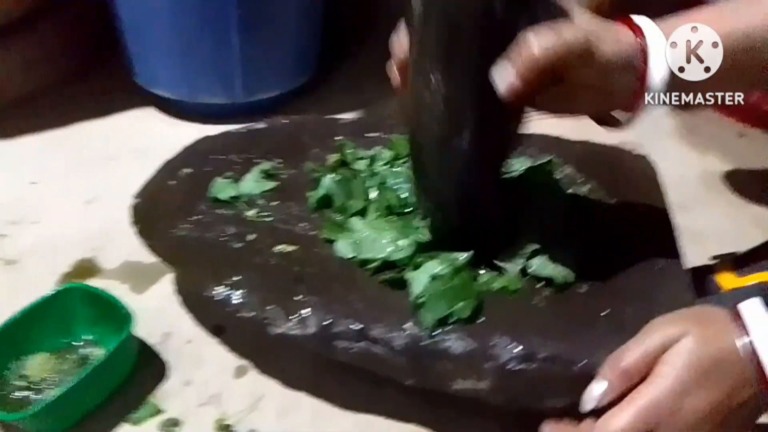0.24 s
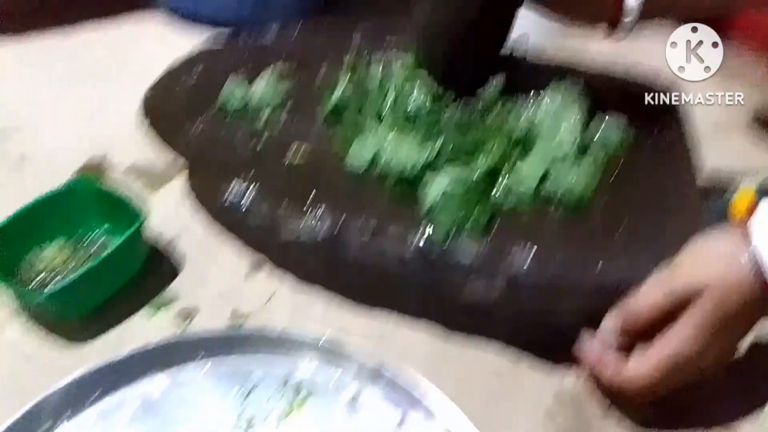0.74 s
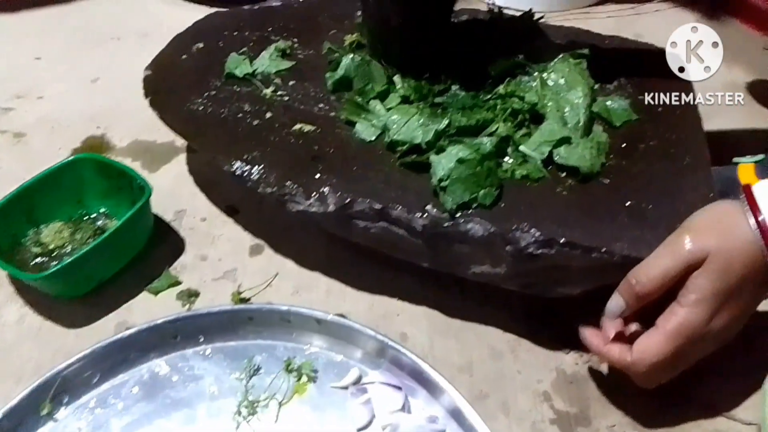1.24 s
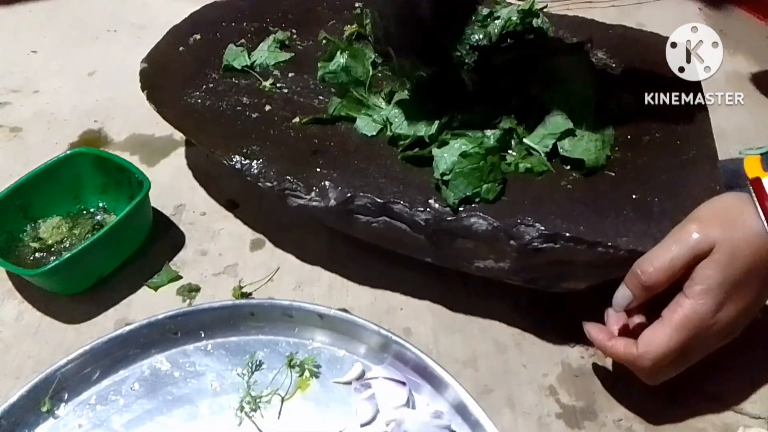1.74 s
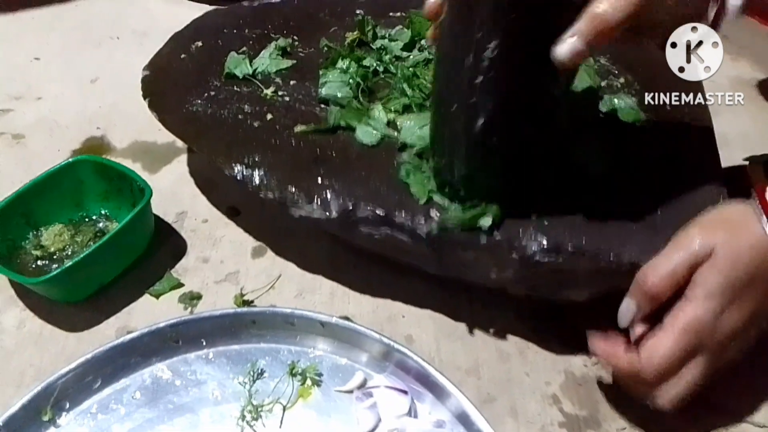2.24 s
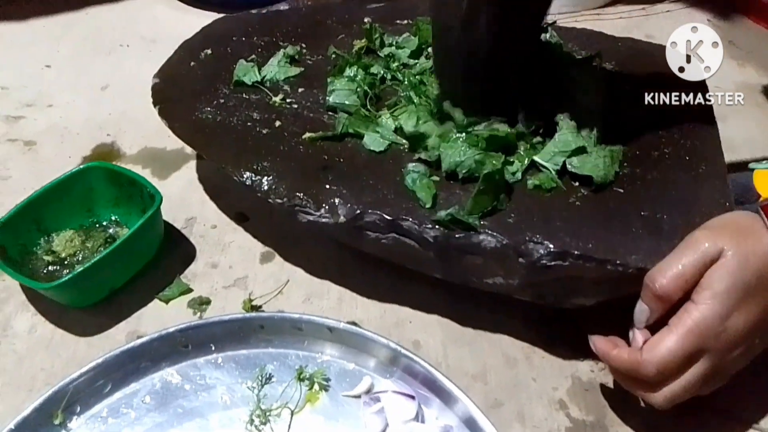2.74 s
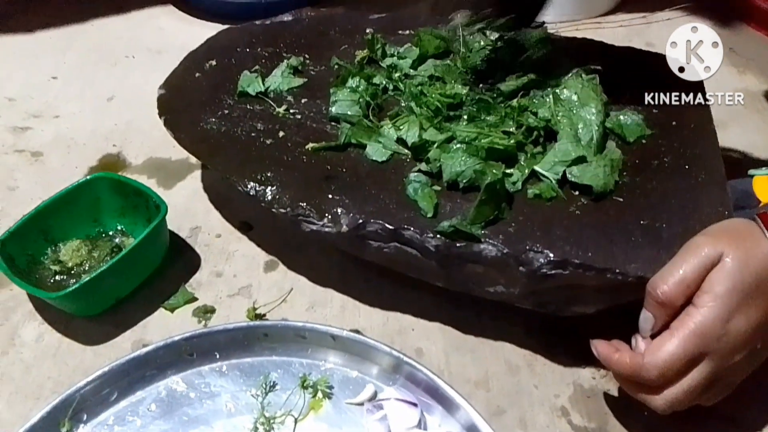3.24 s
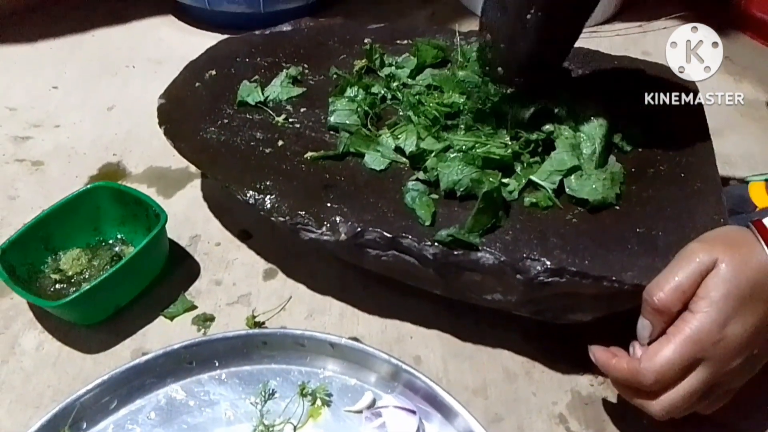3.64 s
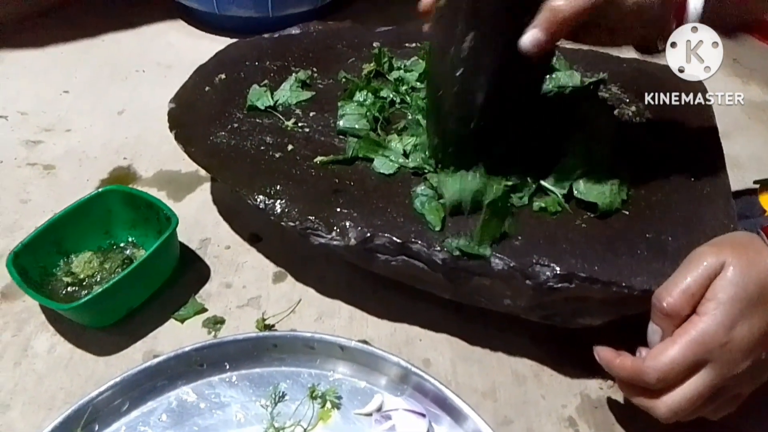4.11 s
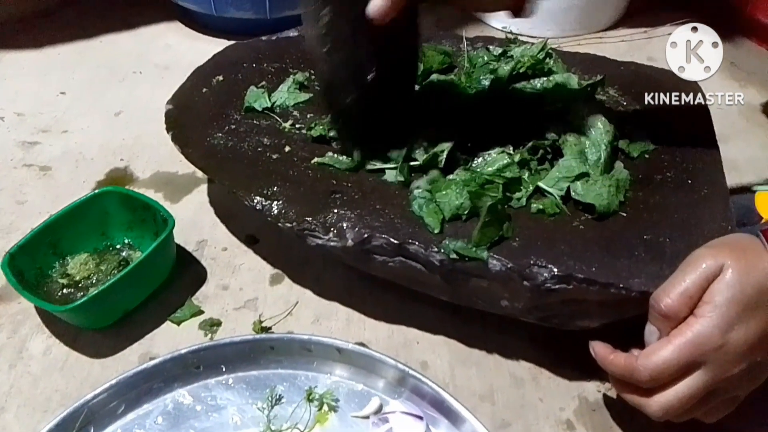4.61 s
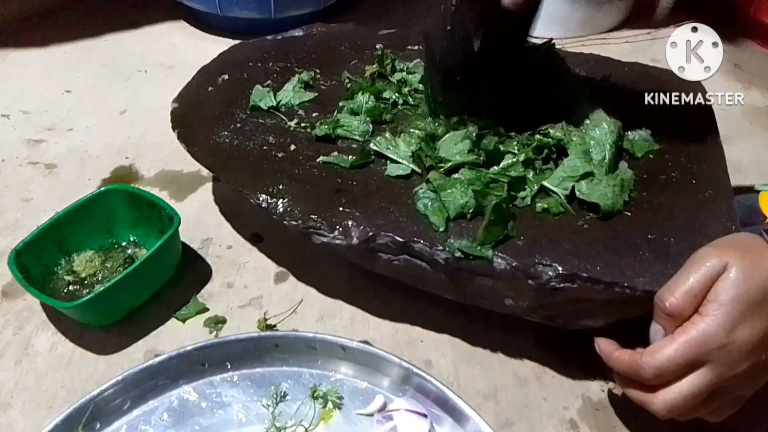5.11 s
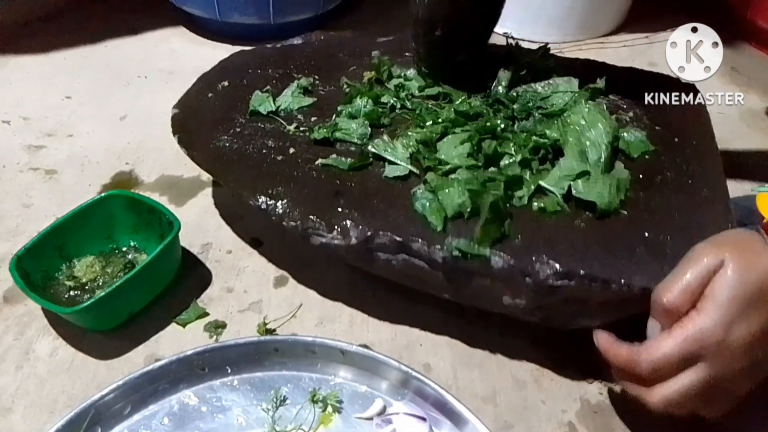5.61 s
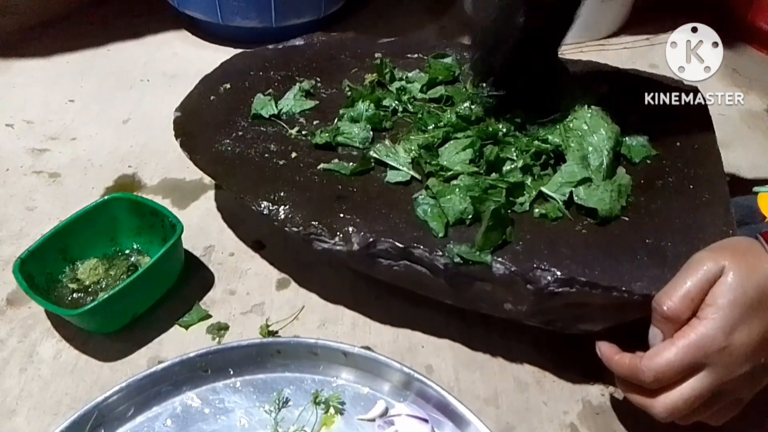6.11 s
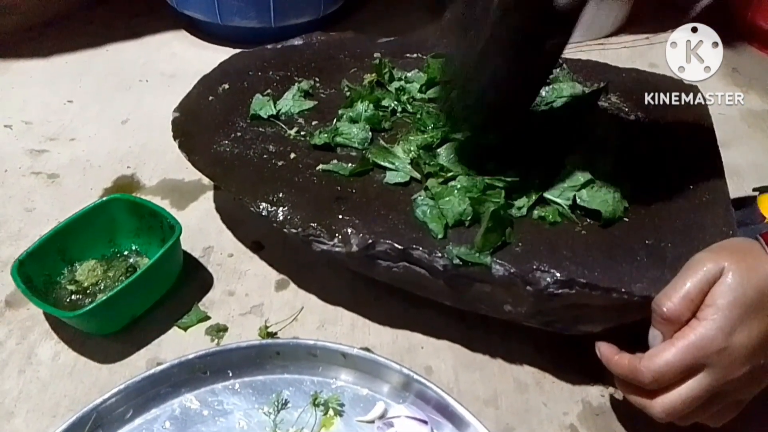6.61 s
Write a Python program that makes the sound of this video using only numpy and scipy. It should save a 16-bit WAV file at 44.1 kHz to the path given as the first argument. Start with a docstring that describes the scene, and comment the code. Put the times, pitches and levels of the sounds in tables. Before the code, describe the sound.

Steady stone pounding of leaves, under three blows a second, mostly soft and leafy, with a few loud stone-on-stone knocks and short room echo.

```python
"""A hand-held stone pounds fresh leaves on a flat slab on a kitchen floor, under three blows a second.
Each blow layers leaf crackle, a clack of stone modes and grit noise, a low thud of floor modes and a wet squelch.
Between blows come gritty ticks, scrapes and rustles of crackling noise; a steel tray rings as fluttering modes.
Standing waves and shifting noise echoes make the small hard room, over a faint bed of coloured noise."""
import sys
import numpy as np
from scipy import signal
from scipy.fft import rfft, irfft
from scipy.io import wavfile

SR = 44100
rng = np.random.default_rng(int(sys.argv[2]) if len(sys.argv) > 2 else 0)


def digitize_waveform(pressure):
    """Quantize a signal to 16-bit integers and store it at the path in sys.argv[1].

    Rows of a 2-D input are taken as channels; values are limited to [-1, 1].
    """
    field = np.atleast_2d(pressure).T
    bounded = np.clip(field, -1, 1)
    quanta = np.round(bounded * 32767).astype(np.int16)
    wavfile.write(sys.argv[1], SR, quanta)


N = 302526
T = np.arange(int(1.5 * SR)) / SR  # time axis for single sounds, s

# Levels in the tables are relative: each layer adds its own mix gain.
# blows of the stone: landing_s, clack_db, contact_hardness_hz, grit_in_clack_db,
# leaf_crunch_db, wet_squelch_db, floor_thud_db
STONE_BLOWS = [ (0.194, -43.5, 840, -2, -42.5, -60, -43), (0.568, -39.5, 860, 0, -37.5, -51, -39.5),
               (0.94, -31.5, 924, -5.5, -36, -49.5, -39), (1.2887, -7, 1026, -10, -29, -51.5, -33.5),
               (1.649, -30, 657, 0, -41, -68, -36.5), (2.037, -29.5, 894, 1.5, -37.5, -56, -37.5),
               (2.408, -32, 950, -1.5, -35, -50, -40), (2.803, -7.5, 1850, -4, -28.5, -46.5, -31.5),
               (3.196, -42.5, 847, 0.5, -38, -44, -38.5), (3.551, -49, 840, -3, -39.5, -56.5, -41),
               (3.911, -14.5, 1510, -4.5, -33, -44, -33.5), (4.284, -5, 1715, -6, -33, -65.5, -31),
               (4.607, -45, 890, 11, -47.5, -67, -44.5), (4.949, -36.5, 806, -0.5, -37.5, -49, -40.5),
               (5.371, -7.5, 1660, -3, -33.5, -45, -34), (5.748, -31, 680, 0, -35.5, -65, -40.5),
               (6.113, -34, 747, -2, -37.5, -52, -40.5), (6.479, -11, 1286, -4.5, -35, -53, -32.5)]
# small taps, scrapes and leaf rustles between blows: start_s, decay_s, grit_level_db
TAPS_AND_SCRAPES = [(0.0, 0.095, -69.5), (0.473, 0.0051, -50.5), (0.797, 0.0093, -49.5),
                    (0.86, 0.035, -73.5), (2.974, 0.0055, -29), (3.325, .054, -67.5), (3.708, 0.023, -65.5),
                    (5.535, 0.035, -40.5), (5.963, 0.018, -53.5), (6.629, 0.0033, -48)]
# nudges of the tray: start_s, level_db
TRAY_NUDGES = [(0.797, -64.5), (0.947, -62.5), (3.108, -68)]
# modes of the slab, before the leaf pad lowers and damps them: pitch_hz, level_db, free_t60_s
SLAB_MODES = [(537, -16.5, 0.0085), (648, -7.5, 0.036), (720, -12.5, 0.023), (862.3, -1, .03),
              (846, 3, 0.035), (972.8, -9, 0.067), (1118.3, -10.5, 0.03), (1228, -9.5, 0.025),
              (1294, -6, 0.038), (1344.4, -8, 0.046), (1428.5, -15.5, 0.025), (1572, -14, .03),
              (1726, -10.5, 0.025), (1942, -14, 0.037)]
# modes of the hand stone: pitch_hz, level_db, t60_s
PESTLE_MODES = [(2281, -9.5, 0.01), (2309, -9.5, 0.033), (2290, -13.5, 0.0061), (2720, -18, 0.035),
                (2807, -25.5, 0.021), (3000, -33, 0.037), (5350, -21.5, 0.043)]
# modes of the slab on the floor: pitch_hz, level_db, t60_s
FLOOR_MODES = [(56, -14, 0.26), (84, -1, 0.072), (115.3, -2, 0.022), (145, -8, 0.039), (196, -12, 0.15)]
# modes of the steel tray: pitch_hz, level_db, t60_s
TRAY_MODES = [(860, -2.5, .8), (930, -8.5, .8), (972, -10.5, .7), (1260, -1, 0.4), (1360, 5, 1.2),
              (1380, 1, 2.5), (1290, -4.5, 1), (1420, -6, 1), (1310, -9.5, 0.41), (1637, -12.5, .9),
              (1642, -6, 1.1), (3960, -10.5, 2.2), (4140, -15.5, 2.5), (5770, -14, 1.4)]
# noise colour of bursting leaves: frequency_hz, density_db (per Hz)
CRUNCH_COLOUR = [(300, -29), (1500, -18), (2300, 2), (3200, 9), (5000, 3.5), (7800, 0.5), (10000, -15),
                 (13500, -2), (16000, -11.5)]
# noise colour of grit between stones: frequency_hz, density_db (per Hz)
GRIT_COLOUR = [(150, -2), (330, -6), (800, -4.5), (1350, -6), (1900, -13), (2800, -4), (4000, -15),
               (8000, -34.5), (16000, -38.5)]
# noise colour of the household air: frequency_hz, density_db (per Hz)
AIR_COLOUR = [(25, -15), (50, -10.5), (90, 1), (170, -8.5), (300, -15.5), (420, -10), (800, -7.5),
              (1300, -5), (2000, -12.5), (3200, -15.5), (5000, -25), (10000, -37.5), (14000, -31),
              (16000, -38.5)]
# kitchen echo bands, two layers that start together: centre_hz, near_level_db, near_t60_s, house_level_db,
# house_t60_s
ECHO_BANDS = [(60.3, -4.5, 0.57, -2.5, 1.2), (175, 3.5, 0.53, -0.5, 0.13), (344, -3, 0.55, -12, 0.96),
              (740.7, -4.5, 0.25, -33.5, 2.2), (1300, 1.5, 0.38, -13, 0.82), (2376, 1, 0.39, -15.5, 0.43),
              (4240, -9.5, 0.36, -2, 0.67), (8330, -1.5, 0.38, -11, 0.78), (15100, -11.5, 0.6, -10, .45)]
# standing waves of the kitchen: pitch_hz, level_db
STANDING_WAVES = [(91, -56), (174, -54.5), (193, -50.5), (670, -56), (718, -77), (737, -55), (912, -45.5),
                  (987, -43), (1125, -53.5), (1224, -63), (1313, -69.5), (1345, -56.5), (2024, -51),
                  (2282, -59), (2328, -56.5), (2360, -58.5)]

# The clack level tells how much of the leaf pad a blow gets through; the pairs below follow from it.
PADDED_DB, BARE_DB = -36.5, -11  # clack on a thick pad, and on bare stone
# each pair: (on a thick pad, on bare stone)
FREE_RING = (0.6, 0.69)  # share of the slab's free ringing time
SLAB_PITCH = (0.93, 0.96)  # wet pulp loads the slab and lowers its modes
UPPER_SLAB_DB = (-3, 6)
PESTLE_RING_DB = (-6, 7)
CRUSH_S = (0.0052, 0.0014)
PULP_S = 0.004  # the stone already presses on the slab this long before it lands


def pounding(clack_mix_db=-6, crunch_mix_db=-5, squelch_mix_db=-3, thud_mix_db=-3, thud_lag_s=0.005):
    """Each blow crunches, clacks, thuds and squelches; a thinner pad gives way sooner and damps less."""
    out = np.zeros(N)
    for land_s, clack_db, hard_hz, grit_db, leaf_db, wet_db, floor_db in STONE_BLOWS:
        def by_pad(pair):
            return np.interp(clack_db, [PADDED_DB, BARE_DB], pair)

        crush_s = by_pad(CRUSH_S)
        leaves = crunch(crush_s) * undb(leaf_db + crunch_mix_db)
        add(out, land_s - 2 * crush_s, leaves)

        stones = clack(hard_hz, by_pad(FREE_RING), by_pad(SLAB_PITCH), by_pad(UPPER_SLAB_DB),
                       by_pad(PESTLE_RING_DB), grit_db)
        add(out, land_s - PULP_S, strength(stones, clack_db + clack_mix_db))

        # the heavy slab answers late
        add(out, land_s + thud_lag_s, strength(thud(), floor_db + thud_mix_db))
        add(out, land_s, squelch() * undb(wet_db + squelch_mix_db))
    return out


def clack(hard_hz, free, pitch, upper_db, pestle_db, grit_db, grit_t60=0.021, bite_s=0.0011, size=8192):
    """Stone meets stone: both ring briefly, upper slab modes more on bare stone, and grit cracks between."""
    upper_from_hz = 1050
    slab_modes = [(hz, db + upper_db * (hz > upper_from_hz), t60) for hz, db, t60 in SLAB_MODES]
    slab = ring(slab_modes, size, free, pitch, scatter_db=1.0)
    pestle = undb(pestle_db) * ring(PESTLE_MODES, size)
    grit = noise(GRIT_COLOUR, size) * fade(grit_t60, size)
    bite = (1 + np.tanh((T[:size] - PULP_S) / bite_s)) / 2  # the last film of pulp gives way
    contact = bite * (strength(slab + pestle, 0) + strength(grit, grit_db))
    return radiate(soften(contact, hard_hz), low_hz=526.3, high_hz=3040)


def soften(x, hz):
    """A soft contact pushes for longer and leaves the high modes quiet: a low-pass."""
    return signal.sosfilt(signal.butter(2, min(hz, SR / 3), fs=SR, output="sos"), x)


def radiate(x, low_hz, high_hz):
    """A small stone moves little air in the bass, and its blunt face gives little treble."""
    return signal.sosfilt(signal.butter(3, [low_hz, high_hz], "band", fs=SR, output="sos"), x)


def thud(pad_hz=210, rumble_hz=45):
    """The padded weight of the blow shakes the slab on the floor, ringing its low modes."""
    x = soften(ring(FLOOR_MODES, size=16384, scatter_db=4.5), pad_hz)
    return signal.sosfilt(signal.butter(2, rumble_hz, "high", fs=SR, output="sos"), x)


def crunch(crush_s, spread_db=3, release_s=0.0043):
    """Bursting leaf cells swell to a plateau before the landing, then die away after it."""
    x = crackle(CRUNCH_COLOUR, spread_db)
    t = T[:len(x)] - 2 * crush_s  # zero at the landing
    press = np.exp(-(np.minimum(t + crush_s / 2, 0) / (0.54 * crush_s)) ** 2)
    release = np.exp(-np.maximum(t, 0) / release_s)
    return x * press * release


def squelch(spread_db=5, decay_s=0.012):
    """Juice spits out from under the resting stone as a decaying crackle."""
    x = crackle(CRUNCH_COLOUR, spread_db, size=16384)
    return x * np.exp(-T[:len(x)] / decay_s)


def taps_and_scrapes(spread_db=3, attack_s=0.002, rustle_db=-32, rustle_follow=0.65):
    """Gritty ticks and scrapes: decaying crackle, with a leaf rustle that grows with the grit."""
    out = np.zeros(N)
    for start_s, decay_s, grit_db in TAPS_AND_SCRAPES:
        leaf_db = rustle_db + rustle_follow * grit_db  # follow: dB of rustle per dB of grit
        grit = undb(grit_db) * crackle(GRIT_COLOUR, spread_db, size=16384)
        leaves = undb(leaf_db) * crackle(CRUNCH_COLOUR, spread_db, size=16384)
        t = T[:len(grit)]
        envelope = (1 - np.exp(-t / attack_s)) * np.exp(-t / decay_s)
        add(out, start_s, (grit + leaves) * envelope)
    return out


def tray(shaken_db=-69, follow=0.25, rock_s=0.02):
    """Nudges and blows set the tray's modes ringing, hard blows more; it rocks, so the ring flutters."""
    pushes = np.zeros(N)
    for start_s, db in TRAY_NUDGES:
        add(pushes, start_s, undb([db]))
    for land_s, clack_db, *_ in STONE_BLOWS:
        add(pushes, land_s, undb([shaken_db + follow * clack_db]))
    flutter = wander(rock_s)
    ringing = signal.fftconvolve(pushes, ring(TRAY_MODES, len(T)))[:N]
    return ringing * flutter / flutter.std()


def shifting_room(x, shift_s=1.4, standing_mix_db=-3.5, standing_t60=0.3):
    """Standing waves ring along; echo patterns cross-fade as the cook and the phone move."""
    place = np.arange(N) / SR / shift_s  # a new pattern takes over every shift_s
    modes = [(hz, db, standing_t60) for hz, db in STANDING_WAVES]
    standing = undb(standing_mix_db) * ring(modes, len(T))
    out = x + signal.fftconvolve(x, standing)[:N]
    for k in range(int(place[-1]) + 2):
        share = np.maximum(1 - np.abs(place - k), 0)
        out += signal.fftconvolve(x * np.sqrt(share), kitchen())[:N]
    return out


def kitchen(first_wall_s=0.0013, build_s=0.0022, build_cycles=2.9, size=49152):
    """One echo pattern: banded noise in two decaying layers, the near walls and the rest of the house."""
    log_f = np.log(np.maximum(np.fft.rfftfreq(size, 1 / SR), 1))
    log_hz = np.log([row[0] for row in ECHO_BANDS])
    spectra = rfft(rng.standard_normal((2, size)))
    response = np.zeros(size)
    for share, (hz, near_db, near_t60, house_db, house_t60) in zip(np.eye(len(ECHO_BANDS)), ECHO_BANDS):
        bands = irfft(spectra * np.interp(log_f, log_hz, share), size)
        # long waves take longer to fill the room
        onset = 1 - np.exp(-np.maximum(T[:size] - first_wall_s, 0) / (build_s + build_cycles / hz))
        for band, db, t60 in zip(bands, (near_db, house_db), (near_t60, house_t60)):
            shape = onset * fade(t60, size)
            response += undb(db) * band * shape / np.sqrt(np.sum(shape ** 2))
    return response


def background(level_db=-66.5, sway_db=1, sway_s=0.27):
    """Faint household air: coloured noise that swells and sinks a little."""
    return noise(AIR_COLOUR, N) * undb(level_db + sway_db * wander(sway_s))


def undb(db):
    """Decibels to gain."""
    return 10 ** (np.asarray(db) / 20)


def fade(t60, size):
    """An exponential decay that loses 60 dB in t60 seconds."""
    return np.exp(-np.log(1000) * T[:size] / t60)


def add(out, start_s, x):
    """Mix x into out from start_s, trimming whatever falls outside."""
    i = int(round(start_s * SR))
    x, i = x[max(-i, 0):], max(i, 0)
    out[i:i + len(x)] += x[:len(out) - i]


def wander(step_s):
    """A random curve over the whole scene, with a new target every step_s seconds."""
    knots = np.arange(0, N / SR + 1, step_s)
    return np.interp(np.arange(N) / SR, knots, rng.standard_normal(len(knots)))


def noise(colour, size):
    """Noise of rms 1, its spectrum drawn through the points of a colour table."""
    hz, db = np.transpose(colour)
    f = np.maximum(np.fft.rfftfreq(size, 1 / SR), 1)
    gain = undb(np.interp(np.log(f), np.log(hz), db))
    x = irfft(rfft(rng.standard_normal(size)) * gain, size)
    return x / x.std()


def crackle(colour, spread_db, size=8192):
    """Dense tiny bursts of very unequal strength, at rms 1."""
    grain = 16  # samples
    strengths = undb(spread_db * np.minimum(rng.exponential(size=size // grain), 4))
    x = noise(colour, size) * np.repeat(strengths, grain)
    return x / x.std()


def ring(modes, size, free=1, pitch=1, scatter_db=0):
    """Sum of decaying modes; free scales the ring times, and scatter weights the modes anew."""
    gains = undb(scatter_db * rng.standard_normal(len(modes)))
    out = np.zeros(size)
    for gain, (hz, db, t60) in zip(gains, modes):
        wave = np.cos(2 * np.pi * hz * pitch * T[:size])
        out += gain * undb(db) * fade(t60 * free, size) * wave
    return out


def strength(x, db):
    """Set the rms of the first 10 ms."""
    return x * undb(db) / np.sqrt(np.mean(x[:SR // 100] ** 2))


def gain_control(x, threshold_db=-32, slope=0.25, sense_s=0.096, settle_s=0.42):
    """A sluggish automatic gain: a hard clack gets through, its echo is turned down."""
    def lag(v, s):
        pole = np.exp(-1 / (s * SR))
        return signal.lfilter([1 - pole], [1, -pole], v)

    level_db = 10 * np.log10(lag(x ** 2, sense_s) + 1e-18)
    over_db = np.maximum(level_db - threshold_db, 0)
    return x * undb(-slope * lag(over_db, settle_s))  # slope: dB of cut per dB over


def scene():
    """The work on the slab and the tray in the room, over a faint background."""
    sources = pounding() + taps_and_scrapes() + tray()
    return (shifting_room(sources) + background())[None]


def record(dry, ceiling=1.0, top_hz=15700):
    """The phone rides its gain, rounds the hardest clacks and cuts the top."""
    x = ceiling * np.tanh(gain_control(dry) / ceiling)
    return signal.sosfilt(signal.ellip(8, 0.2, 70, top_hz, fs=SR, output="sos"), x)


dry = scene()
out = record(dry)
digitize_waveform(out)
```